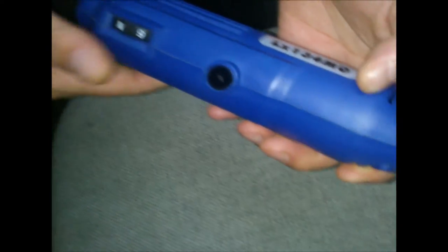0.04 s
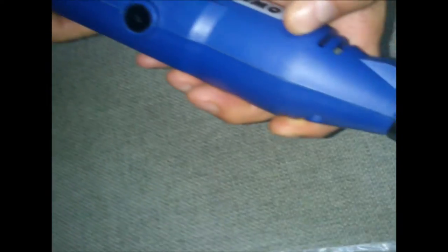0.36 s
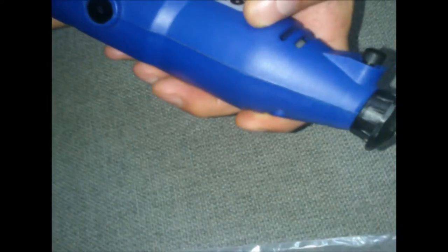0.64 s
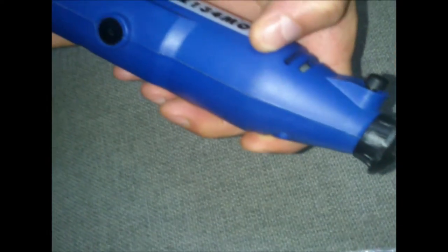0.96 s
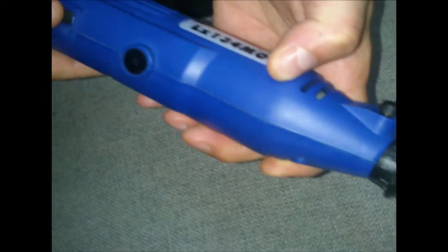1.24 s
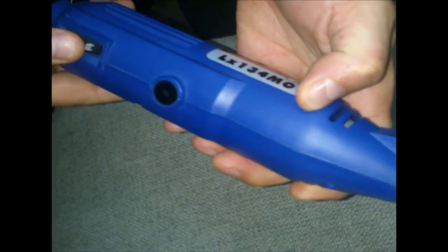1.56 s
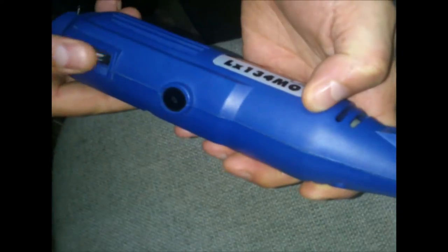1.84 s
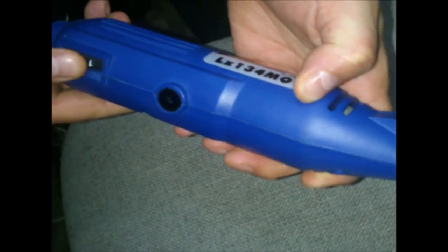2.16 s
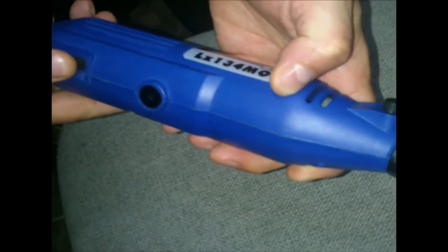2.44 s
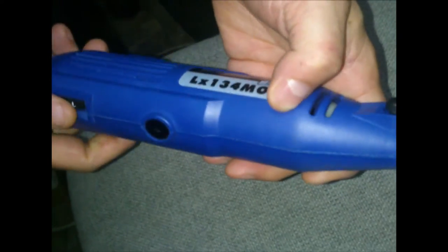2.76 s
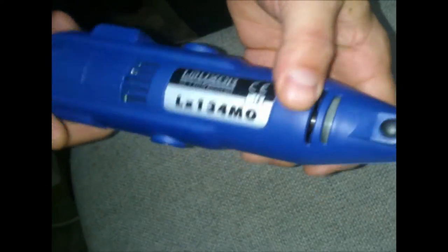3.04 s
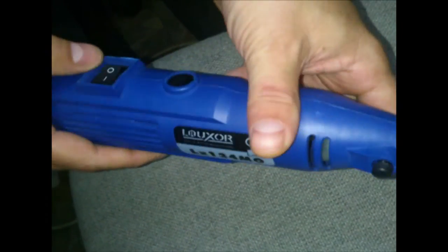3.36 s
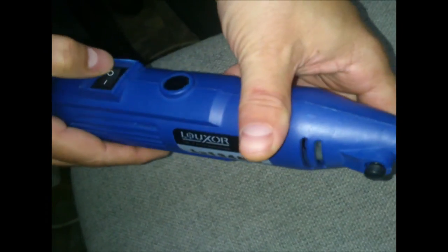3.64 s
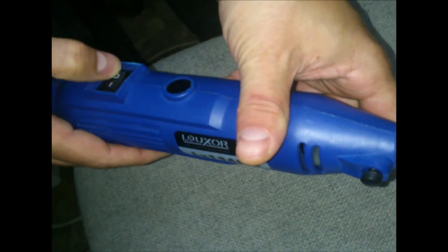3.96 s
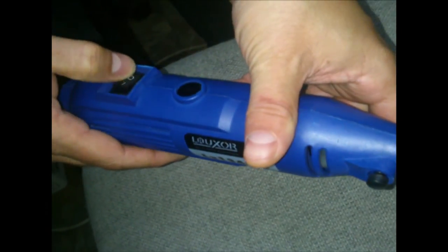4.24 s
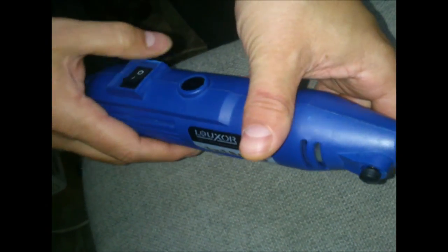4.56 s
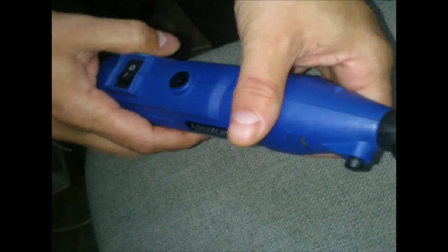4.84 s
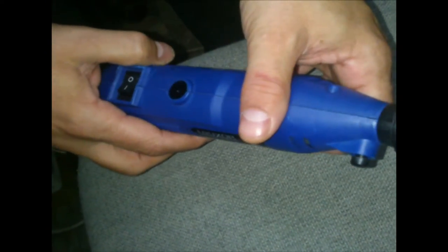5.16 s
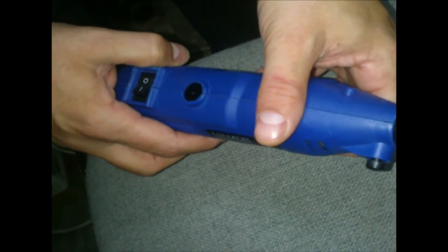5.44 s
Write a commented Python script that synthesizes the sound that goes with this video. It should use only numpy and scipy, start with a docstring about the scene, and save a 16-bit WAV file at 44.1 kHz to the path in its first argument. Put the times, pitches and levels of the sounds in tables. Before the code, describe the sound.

A small electric rotary tool whines shrilly, rises a little, slows to a lower pitch, then clicks off and winds down.

```python
"""A quiet room, where a small electric rotary tool, held close, runs with no load.
Its speed wheel is turned up, then down; the rocker switch clicks off and the rotor coasts.
The motor whines at eight times the shaft rate and buzzes with its chopped supply.
Rotor vibration sounds through the plastic housing, over fan rush and brush hiss."""
import sys
import numpy as np
from scipy import signal
from scipy.fft import rfft, irfft
from scipy.io import wavfile
from scipy.ndimage import uniform_filter1d

SR = 44100
rng = np.random.default_rng(int(sys.argv[2]) if len(sys.argv) > 2 else 0)


def generate_wav(sig):
    """Save sig (samples, or channels by samples) to the path in sys.argv[1] as 16-bit PCM at SR."""
    pcm = np.round(np.clip(np.atleast_2d(sig).T, -1, 1) * 32767).astype(np.int16)
    wavfile.write(sys.argv[1], SR, pcm)


N = 242991
TIME_S = np.arange(N) / SR
BINS_HZ = np.maximum(np.arange(N // 2 + 1) * SR / N, 1)
SLOTS, CHOP_HZ, SWITCH_OFF_S = 8, 140, 4.582
CUTOFF_HZ = 15600


def from_db(db):
    """Decibels to gain."""
    return 10 ** (np.asarray(db) / 20)


def in_time(rows):
    """Each column of a time curve at every sample."""
    times_s, *columns = np.transpose(rows)
    return [np.interp(TIME_S, times_s, column) for column in columns]


def at_hz(spectrum, hz):
    """Level in dB, interpolated over log frequency."""
    freqs_hz, levels_db = np.transpose(spectrum)
    return np.interp(np.log(hz), np.log(freqs_hz), levels_db)


def noise(bin_gains):
    """Unit-rms noise of the given spectral shape."""
    shaped = irfft(rfft(rng.standard_normal(N)) * bin_gains, N)
    return shaped / np.sqrt(np.mean(shaped ** 2) + 1e-20)


def drift(rate_hz):
    """Unit-rms random wander."""
    return noise(1 / (1 + (BINS_HZ / rate_hz) ** 2))


def speed_gain(shaft_hz, top_db, db_per_decade):
    """Power law of the shaft rate, reaching top_db at top speed."""
    return from_db(top_db + db_per_decade * np.log10(shaft_hz / shaft_hz.max()))


def resonate(resonances, hz):
    """Gain of a tone gliding through resonances, and the offset in Hz to those it excites most."""
    centre_hz, half_width_hz, level_db = np.transpose(resonances)[:, :, None]
    power = (from_db(level_db) / (1 + ((hz - centre_hz) / half_width_hz) ** 2)) ** 2
    total = power.sum(0)
    return np.sqrt(total), (power * (centre_hz - hz)).sum(0) / total


def current_db(shaft_hz, powered, db_per_hz_per_s=0.021):
    """Motor current relative to steady running; it follows the rotor's acceleration."""
    accel_hz_per_s = uniform_filter1d(np.gradient(shaft_hz) * SR * powered, size=6000)
    return db_per_hz_per_s * powered * accel_hz_per_s


# room noise spectrum: f/Hz, relative level/dB
ROOM_SPECTRUM = [(15, 1.5), (33, -3), (62, -9.5), (100, -15), (190, -20.5), (260, -15.5), (430, -20.5),
                 (1000, -19.5), (4000, -32.5), (15000, -29.5)]
# room hums: f/Hz, half width/Hz, level/dB
ROOM_HUMS = [(50.4, 3, -71), (163.5, 2, -73), (310.1, 6.6, -66)]


def room(rumble_db=-52.5, drone_hz=77, drone_db=-62.0, swell_db=2.5, waver_hz=1.19):
    """Faint rumble, a low drone that swells and fades, and a few wavering hums."""
    drone_gain = np.sqrt(2) * from_db(drone_db + swell_db * drift(1.7))
    drone_phase = 2 * np.pi * np.cumsum(drone_hz + waver_hz * drift(2.25)) / SR
    hums = sum(from_db(level_db) * noise(1 / (1 + ((BINS_HZ - hz) / half_width_hz) ** 2))
               for hz, half_width_hz, level_db in ROOM_HUMS)
    rumble = from_db(rumble_db) * noise(from_db(at_hz(ROOM_SPECTRUM, BINS_HZ)))
    return drone_gain * np.sin(drone_phase) + hums + rumble


def grip(at_s=2.9, sigma_s=0.031, level_db=-53.0, corner_hz=90):
    """The hand turns the tool over with one soft, low bump."""
    swell = np.exp(-.5 * ((TIME_S - at_s) / sigma_s) ** 2)
    return from_db(level_db) * swell * noise(1 / (1 + (BINS_HZ / corner_hz) ** 4))


# wheel and switch clicks: t/s, level/dB, ring f/Hz, length/s
PLASTIC_CLICKS = [(0.3736, -15, 11000, 0.0032), (4.5803, -17.5, 9400, 0.0013)]


def clicks(half_width_hz=1800, tail_s=0.00018, shell_db=-16, shell_hz=6000):
    """A short scrape of plastic rings one high resonance and, more faintly, the shell below it."""
    out, t = np.zeros(N), np.arange(512) / SR
    for at_s, level_db, ring_hz, length_s in PLASTIC_CLICKS:
        scrape = rng.standard_normal(len(t)) * np.exp(-np.maximum(t - length_s, 0) / tail_s)
        start = round(at_s * SR)
        for centre_hz, part_db in [(ring_hz, 0), (shell_hz, shell_db)]:
            band_hz = [centre_hz - half_width_hz, centre_hz + half_width_hz]
            snap = signal.sosfilt(signal.butter(2, band_hz, "band", fs=SR, output="sos"), scrape)
            snap_rms = np.sqrt(np.sum(snap ** 2) / (length_s * SR))
            out[start:start + len(t)] += from_db(level_db + part_db) * snap / snap_rms
    return out


# vent air spectrum: f/Hz, relative level/dB
FAN_SPECTRUM = [(150, -31.5), (400, -23), (700, -17), (1000, -20.5), (1200, -12), (1450, -1), (1700, -9),
                (2050, 3.5), (2400, -5), (2800, 1.5), (3200, -8), (3600, -7.5), (4200, -18), (6000, -19),
                (9000, -47)]


def fan(shaft_hz):
    """Air rushes through the vents, louder with speed."""
    rush = noise(from_db(at_hz(FAN_SPECTRUM, BINS_HZ)))
    return speed_gain(shaft_hz, top_db=-35, db_per_decade=59.3) * rush


# brush hiss spectrum: f/Hz, relative level/dB
BRUSH_SPECTRUM = [(1000, -31.5), (3500, -8.5), (5400, -12), (6200, -8.5), (7200, -5.5), (8000, -5.5),
                  (9000, -2), (10200, 0), (11500, -2.5), (13000, -4.5), (14200, -6), (15200, -17.5)]


def brushes(shaft_hz, angle, chop_phase, powered, rub_depth=0.34, spark_depth=0.022, flicker_db=.5):
    """Brushes slide on the commutator, rub harder once a turn and spark with the current."""
    sliding = speed_gain(shaft_hz, top_db=-42, db_per_decade=5.9)
    sparking = powered * speed_gain(shaft_hz, top_db=-30.5, db_per_decade=67.4)
    contact = (1 + rub_depth * np.cos(angle)) * (1 + spark_depth * powered * np.cos(chop_phase))
    flicker = from_db(flicker_db * drift(60))
    hiss = noise(from_db(at_hz(BRUSH_SPECTRUM, BINS_HZ)))
    return np.hypot(sliding, sparking) * flicker * contact * hiss


# rotor vibration: shaft order, relative level/dB
ROTOR_ORDERS = [(1, 9.5), (2, 5), (3, 2.5), (4, -1.5), (5, -17), (6, -8.5), (7, -2.5), (9, 4.5), (10, -3),
                (11, -7), (12, -6.5), (13, -8), (14, -4.5), (15, 3.5), (17, 3), (18, 2), (19, -12),
                (20, -2.5), (21, -9), (22, 0), (23, 4), (25, 6), (26, -9), (27, -2), (28, -1), (29, -11),
                (30, 0), (31, 11), (33, 1), (34, -2), (35, -3)]
# plastic housing response: f/Hz, gain/dB
HOUSING_RESPONSE = [(500, -14.5), (1200, -6), (2400, -8), (3400, 7.5), (4200, -2.5), (5400, -4.5),
                    (6500, 1.5), (7600, 1.5), (9000, 10.5), (10500, 4), (12000, 3), (13400, -1.5),
                    (14500, -1), (15800, -11)]


def rotor(shaft_hz, angle, powered, coasting_db=-8.0, ripple_db=3.5, modes_from_hz=2500,
          flutter_db=2.4, high_db=7.5, cluster_db=6.5, brush_pair_db=3.5):
    """Shaft harmonics slide through the housing's broad response and its many narrow resonances."""
    unbalance = speed_gain(shaft_hz, top_db=-48, db_per_decade=59)
    chatter = speed_gain(shaft_hz, top_db=-50.5, db_per_decade=22)
    chatter *= from_db(current_db(shaft_hz, powered) + coasting_db * (1 - powered))
    grid_hz = np.arange(50, CUTOFF_HZ + 400, 200)
    modes_db = ripple_db * (grid_hz > modes_from_hz) * rng.standard_normal(len(grid_hz))
    housing = from_db(at_hz(HOUSING_RESPONSE, grid_hz) + modes_db)
    housing[-1] = 0   # silent above the grid
    flutters = [from_db(flutter_db * drift(3.5)) for _ in range(7)]
    # high orders cluster at multiples of the slot count, most where both brushes add up
    high_orders = np.arange(round(ROTOR_ORDERS[-1][0]) + 1, 112)
    slot_phase = 2 * np.pi * (high_orders + .5) / SLOTS
    high_levels_db = high_db + cluster_db * np.cos(slot_phase) + brush_pair_db * np.cos(slot_phase / 2)
    out = np.zeros(N)
    for order, level_db in [*ROTOR_ORDERS, *zip(high_orders, high_levels_db)]:
        drive = (unbalance if order < SLOTS else chatter) * flutters[round(order) % len(flutters)]
        gain = from_db(level_db) * drive * np.interp(order * shaft_hz, grid_hz, housing)
        if order <= 2:   # unbalance force grows with speed squared
            gain *= (shaft_hz / shaft_hz.max()) ** 2
        out += gain * np.sin(order * angle + rng.uniform(0, 2 * np.pi))
    return out


# resonances crossed by the overtones: f/Hz, half width/Hz, level/dB
OVERTONE_MODES = [(3470, 1200, -61.5), (6100, 410, -51), (6787, 39, -44), (7640, 1100, -58),
                  (9040, 780, -40.5), (10240, 140, -43), (11000, 350, -40.5), (11970, 350, -39.5),
                  (12800, 1300, -41.5), (14600, 650, -43)]
# slot tone harmonics 2, 3, 4: relative level/dB
HARMONICS_DB = [5, -3, -3]


def overtones(shaft_hz, angle, chop_phase, powered, buzz_depth=0.25, current_share=0.35, flutter_db=2.0):
    """Slot harmonics swell at resonances; they throb with the supply, or once a turn when coasting."""
    out = np.zeros(N)
    drive_db = current_share * current_db(shaft_hz, powered)
    for harmonic, level_db in enumerate(HARMONICS_DB, 2):
        response, _ = resonate(OVERTONE_MODES, harmonic * SLOTS * shaft_hz)
        # the loose, off-centre rotor splits each overtone into a cluster
        sway = sum(depth * (1 + drift(8) / 2) * np.cos(order * angle + rng.uniform(0, 2 * np.pi))
                   for order, depth in [(1, .9), (2, .45)])
        throb = 1 + buzz_depth * powered * np.cos(chop_phase) + (1 - powered) * sway
        gain = response * from_db(level_db + drive_db + flutter_db * drift(13))
        out += gain * throb * np.sin(harmonic * SLOTS * angle)
    return np.sqrt(2) * out


# housing resonances crossed by the slot tone: f/Hz, half width/Hz, level/dB
WHINE_MODES = [(2400, 570, -60.5), (2810, 140, -41), (3930, 256, -26.5), (4732, 363, -29)]
# sideband spread, wider as the wheel shortens the current pulses: t/s, spread/Hz
SIDEBAND_SPREAD = [(0, 140), (.7, 113), (1.8, 103), (2.2, 177), (3.0, 160), (4.58, 185)]


def whine(shaft_hz, angle, chop_phase, powered, steady_gain=0.4, pull_share=0.49, pull_limit_hz=290,
          flutter_db=2.06, coasting_db=-9.0):
    """Current pulses excite bursts of slot tone: sidebands a chop rate apart, leaning to a resonance."""
    response, to_resonance_hz = resonate(WHINE_MODES, SLOTS * shaft_hz)
    pull_hz = pull_limit_hz * np.tanh(pull_share * to_resonance_hz / pull_limit_hz)
    spread_hz, = in_time(SIDEBAND_SPREAD)
    tone, power = 0, 1e-12
    for sideband in range(-3, 6):
        pulsed_gain = powered * np.exp(-.5 * ((sideband * CHOP_HZ - pull_hz) / spread_hz) ** 2)
        gain = (pulsed_gain + steady_gain * (sideband == 0)) * from_db(flutter_db * drift(15))
        tone += gain * np.sin(SLOTS * angle + sideband * chop_phase)
        power += gain ** 2 / 2
    drive = from_db(current_db(shaft_hz, powered) + coasting_db * (1 - powered))
    return response * drive * tone / np.sqrt(power)


# shaft rate under power: t/s, f/Hz
DRIVEN_SPEED = [(0.0, 533.1), (0.08, 546.3), (0.24, 565.9), (0.51, 587.6), (0.7, 595.0), (1.35, 602.4),
                (1.73, 603.9), (2.07, 577.9), (2.36, 538.7), (2.49, 514.7), (2.72, 480.6), (2.84, 466.3),
                (3.09, 446.1), (3.43, 426.6), (3.79, 419.2), (4.2, 416.4), (4.36, 417.2), (4.58, 414.8)]


def shaft_speed(drag_per_s=.43, friction_hz_per_s=210.3):
    """Shaft rate in Hz: set by the wheel, then run down by air drag and brush friction once off."""
    driven_hz, = in_time(DRIVEN_SPEED)
    decay = np.exp(-drag_per_s * np.maximum(TIME_S - SWITCH_OFF_S, 0))
    return driven_hz * decay - friction_hz_per_s / drag_per_s * (1 - decay)


# wavering of the tones: t/s, whine gain/dB, rotor and overtone gain/dB
TONE_WAVER = [(0, 1.5, 1.5), (.62, 1, 2.5), (1.05, -1, -3), (1.5, 1, -1), (1.8, 1, 1), (2.65, -2.5, 3.5),
              (3.02, 2.5, 2), (3.4, 1.5, 0), (3.6, -9, 2), (3.72, -1, 0.5), (4.58, 0, -0.5)]


def scene(speed_wobble=.0002, rattle_rad=0.0079):
    """One shaft angle and one supply rhythm drive the whole tool, heard straight ahead."""
    shaft_hz = shaft_speed()
    chop_phase = 2 * np.pi * CHOP_HZ * TIME_S + np.pi
    powered = np.clip((SWITCH_OFF_S - TIME_S) * CHOP_HZ, 0, 1)
    angle = 2 * np.pi * np.cumsum(shaft_hz * (1 + speed_wobble * drift(17.5))) / SR
    # with no magnetic pull the coasting rotor shakes in its bearings, smearing the high orders
    angle += rattle_rad * (1 - powered) * drift(90)
    motor = (shaft_hz, angle, chop_phase, powered)
    whine_gain, other_gain = from_db(in_time(TONE_WAVER))
    tones = whine_gain * whine(*motor)
    tones += other_gain * (rotor(shaft_hz, angle, powered) + overtones(*motor))
    mono = tones + fan(shaft_hz) + brushes(*motor) + clicks() + grip() + room()
    return np.array([mono, mono])


def record(dry):
    """Steep low-pass on the top treble."""
    return irfft(rfft(dry) / np.sqrt(1 + (BINS_HZ / CUTOFF_HZ) ** 240), N)


dry = scene()
out = record(dry)
generate_wav(out)
```